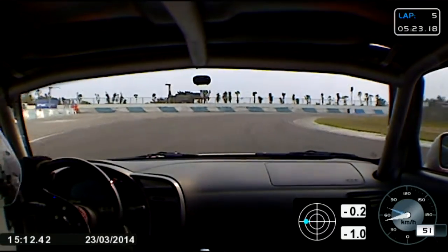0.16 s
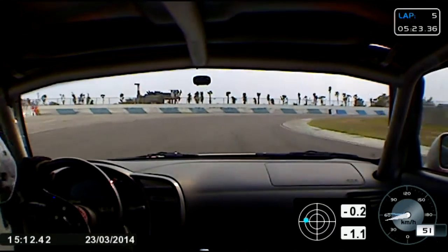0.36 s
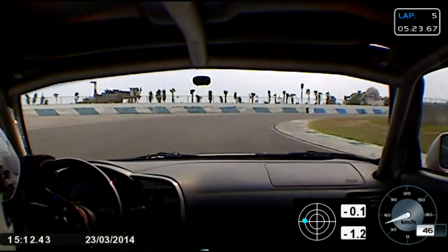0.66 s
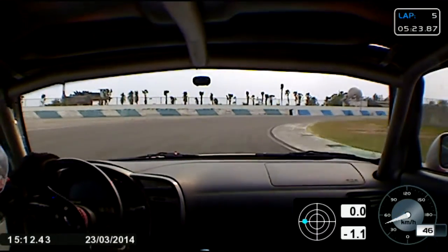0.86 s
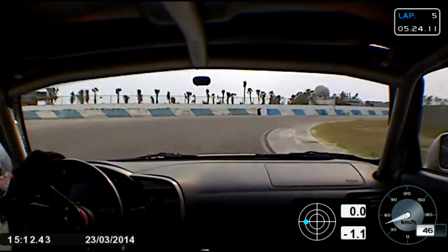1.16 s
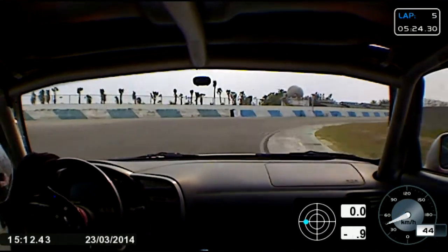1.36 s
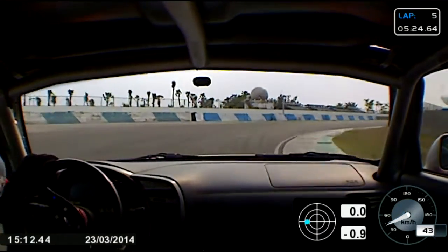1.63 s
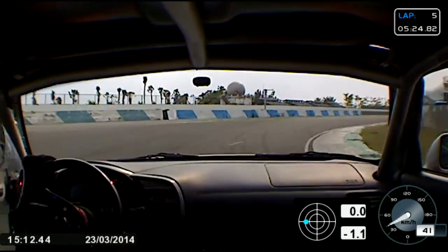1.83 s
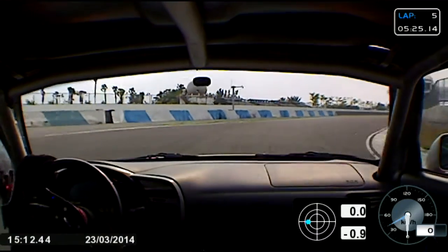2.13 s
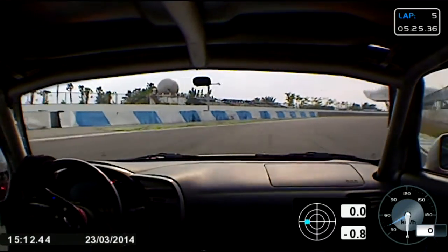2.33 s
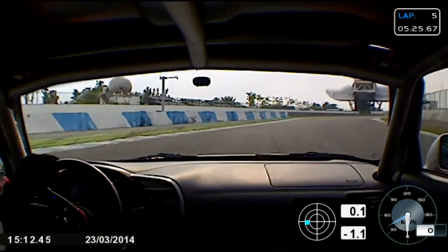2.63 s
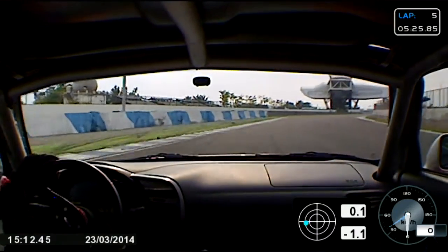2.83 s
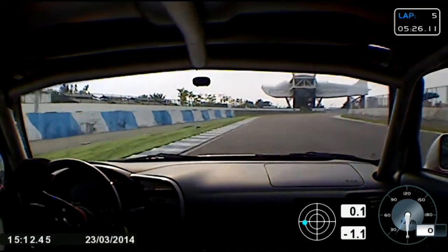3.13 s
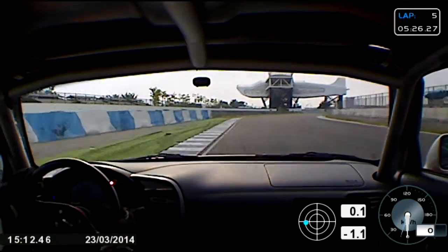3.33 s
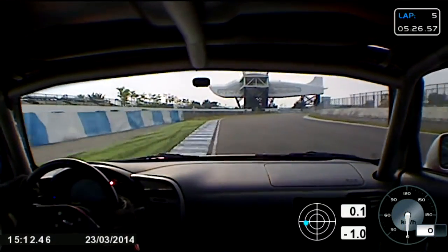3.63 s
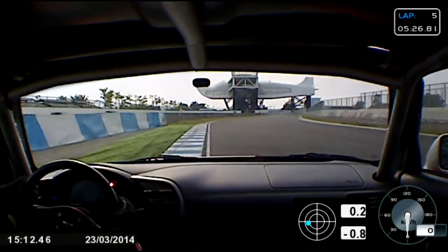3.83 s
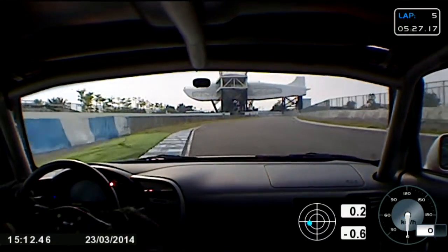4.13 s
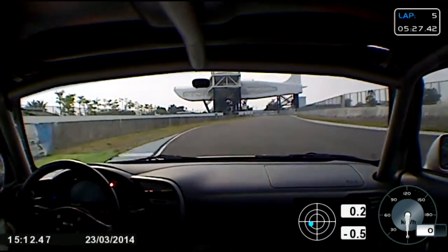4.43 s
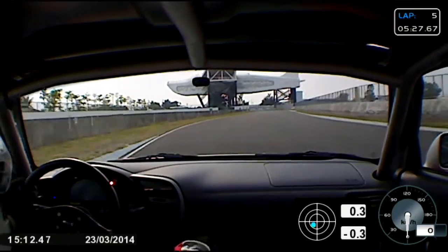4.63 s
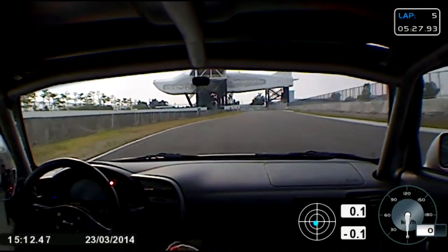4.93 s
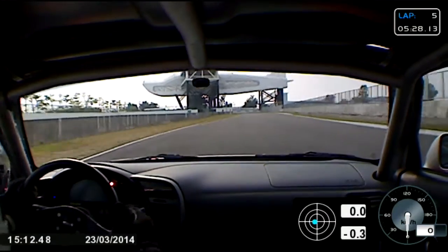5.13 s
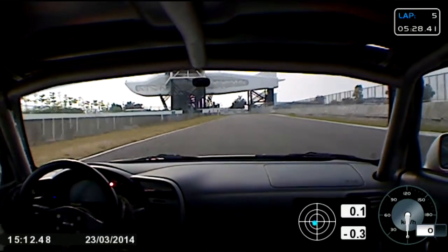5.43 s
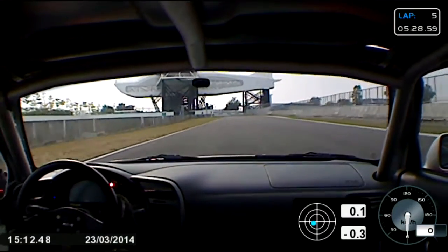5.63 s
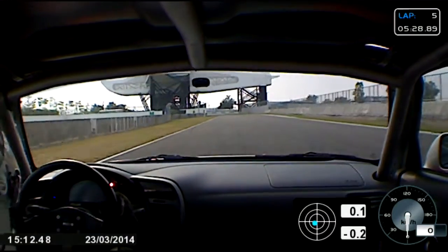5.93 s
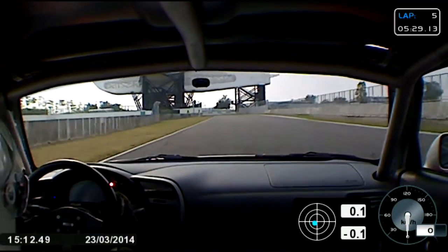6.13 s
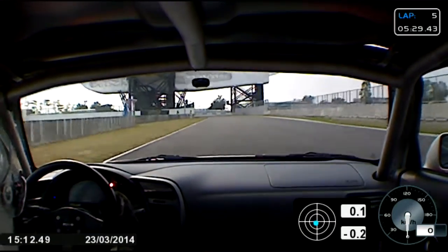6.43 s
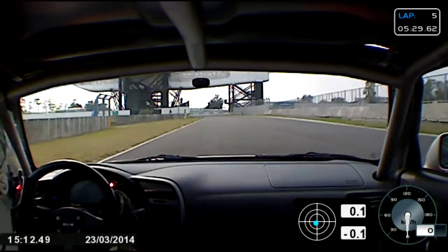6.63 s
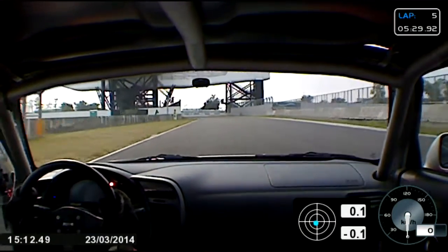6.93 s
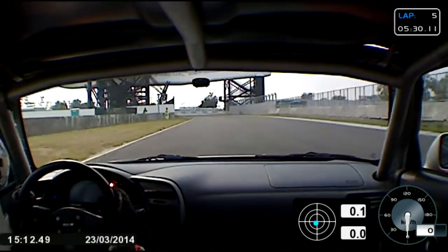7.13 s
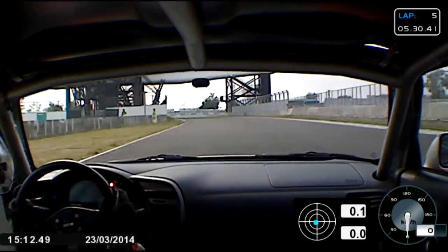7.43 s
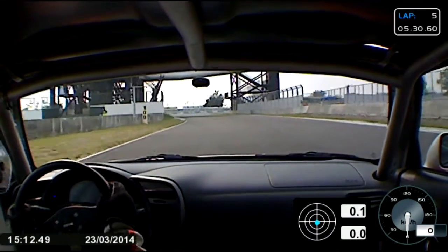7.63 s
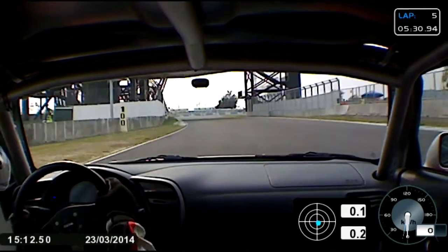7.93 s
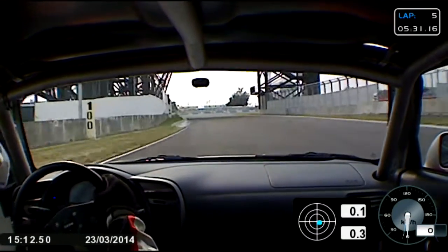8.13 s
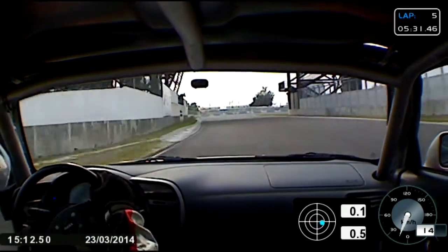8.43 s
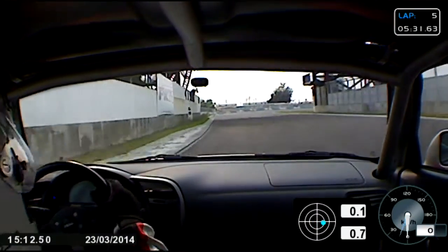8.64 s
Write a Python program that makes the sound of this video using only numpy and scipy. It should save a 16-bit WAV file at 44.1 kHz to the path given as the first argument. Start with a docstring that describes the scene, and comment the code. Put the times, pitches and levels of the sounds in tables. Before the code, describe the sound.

Close inside a race car cabin on a circuit, a four-cylinder engine holds a low, rough drone from 0 to about 2 seconds, wavering slightly, with a gear whine, hollow road rumble and very faint squeaks. The revs then climb steadily, the tone growing harder and more howling. From about 3.7 to 4.4 seconds the wheels run along a ribbed kerb: low humming, a quick string of dull thumps, clattering panels and a few dry clacks. The exhaust swells and flares into a heavy, overloaded boom near 4.7, then cuts abruptly for an upshift; the pitch falls until about 5.2. In the higher gear, with fainter whine, the engine pulls again with a throbbing, snarling note over quieter road noise. Faint squeaks pass around 6.2 to 6.6. Revs keep climbing, hardening after 7.8 into a raspy roar, with a last booming swell near 8.7 as the pitch dips.

```python
"""Race car heard from inside its cabin

A four-cylinder engine holds a corner, accelerates over a ribbed kerb, flares into a loud boom at an upshift
and pulls again. Its harmonics and gated noise pass through fixed resonances; filtered noise gives the road
rumble that rings the cabin. The gears whine, the wheels thump, loose parts clack and something squeaks
faintly. The small microphone rasps when it is overloaded."""
import sys
import numpy as np
from scipy import signal
from scipy.fft import rfft, irfft, next_fast_len
from scipy.io import wavfile
from scipy.ndimage import uniform_filter1d, minimum_filter1d

SR = 44100
rng = np.random.default_rng(int(sys.argv[2]) if len(sys.argv) > 2 else 0)


def unload_wav(signal):
    """Save mono or channel-first audio to the path in sys.argv[1] as 16-bit WAV at rate SR, clipped to [-1, 1]."""
    wavfile.write(
        sys.argv[1],
        SR,
        np.round(np.clip(np.atleast_2d(signal).T, -1, 1) * 32767).astype(np.int16),
    )


N = 386757
TIME = np.arange(N) / SR
CYLINDERS = 4  # firings in one four-stroke cycle
# around this cycle rate the engine comes on song and hardens, over this range of rates
SONG_HZ, SONG_RANGE_HZ = 59.34, 0.14

# nominal four-stroke cycle rate, a quarter of the firing rate: time_s, cycle_rate_hz
CYCLE_RATE = [(0.0, 53.62), (1.15, 54.01), (1.8, 54.87), (2.35, 55.98), (3.05, 57.56), (3.65, 59.09),
              (4.22, 61.33), (4.4, 62.6), (4.67, 63.94), (4.9, 59.6), (5.0, 55.04), (5.12, 53.84),
              (5.21, 50.22), (6.75, 55.65), (7.2, 56.41), (7.8, 59.02), (8.58, 61.18), (8.73, 59)]
# brief jumps and sags of the revs: middle_s, half_length_s, cycle_rate_change_hz
REV_BLIPS = [(0.63, 0.0811, -0.2), (0.793, 0.06983, 1.27), (1.902, 0.04595, 3), (4.745, 0.03703, 3.5),
             (7.274, 0.036, 0.76), (7.535, 0.024, 0.9)]
# the exhaust tones dip in level, most sharply just before the upshift: middle_s, half_length_s, relative_depth_db
EXHAUST_DIPS = [(0, 0.12, -2), (.55, 0.36, -5), (1.81, .05, -2.5), (2.11, 0.087, -3.5),
                (4.795, .012, -10.5), (4.95, 0.1, -2.5), (5.08, 0.13, -4), (7.19, 0.042, -1.5)]
# the exhaust boom flares at the firing rate: middle_s, half_length_s, gain_db
BOOM_FLARES = [(4.096, 0.074, 6), (4.3, 0.11, 5.5), (4.735, .047, 18), (4.82, 0.013, 6), (4.872, .03, 11),
               (8.548, 0.037, 3), (8.75, 0.042, 7.5)]
# the throttle is shut for the gear change: start_s, end_s
THROTTLE_SHUT = (4.775, 5.2)
# the higher gear takes up the load: start_s, end_s
GEAR_CHANGE = (4.9, 5.3)
# multiples 2 to 9 of the cycle, relative strength: lower_gear_db, higher_gear_db
DRONE_ORDERS = [(-5.5, 1.1), (9.5, 9.5), (16.5, 17.5), (-5.5, -3.5), (0.46, -1.5), (-7, 2.1), (13, 12),
                (-11, 1)]
# cabin resonances that the low exhaust tones swell through: frequency_hz, width_hz, gain_db
CABIN_MODES = [(124.74, 7.1, -18.5), (159.6, 19.6, -43), (213.8, 8.9, -48), (231, 2.2, -47),
               (249.3, 18.1, -38), (276.6, 13.84, -18), (293.3, 5.4, -35.5), (324.1, 12, -29),
               (353, 32, -39), (372.4, 20, -42.5), (435, 15, -56.5), (472.4, 28.4, -42.5), (512, 23, -50)]
# burble noise spectrum: frequency_hz, relative_level_db
BURBLE_SPECTRUM = [(150, -34), (195, -11), (245, -2.5), (275, 13), (305, 4.5), (350, -3), (400, -4.5),
                   (480, -8.5), (600, -28.5), (3000, -110)]
# body resonances over the exhaust snarl: frequency_hz, relative_level_db
SNARL_SPECTRUM = [(465, 6.5), (490, 2), (540, -2), (610, -17), (700, -17.5), (780, -1.5), (830, 0.5),
                  (885, 2), (930, -6), (1070, -4.5), (1200, -4.5), (1380, -20.5), (1650, -7), (1760, -13),
                  (1850, -14.5), (2100, -22.5), (3200, -33)]
# resonances that the firing harmonics cross: frequency_hz, relative_level_db
HOWL_SPECTRUM = [(625, -1), (655, -4), (690, -8), (712, 8), (740, -5), (790, 1.5), (833, 11.5), (875, 1),
                 (913, 6.5), (938, 5.5), (955, 10), (985, 19), (1000, 8.5), (1045, 4.5), (1110, 1),
                 (1150, -4), (1210, 0.5), (1260, -6.5), (1310, -18.5), (1370, -3.5), (1480, -11.5),
                 (1560, 1.5), (1620, -4.5), (1683, -8), (1756, -13.5), (1923, -10.5), (2150, -25),
                 (2850, -20)]
# crank-rate blare spectrum at high revs: frequency_hz, relative_level_db
BLARE_SPECTRUM = [(375, -33.5), (500, -31.5), (560, -53), (630, -43), (750, -56.5), (855, -62.5),
                  (885, -50), (1000, -61.5), (1130, -50), (1390, -47.5), (1700, -57), (2000, -66)]
# intake and valve-gear noise spectrum: frequency_hz, relative_level_db
RUSH_SPECTRUM = [(200, -20), (520, -12), (660, -6), (850, 5.5), (1100, 2), (1350, -1.5), (1540, -4.5),
                 (1680, 0), (1900, -4), (2080, -15.5), (3200, -13), (3650, -21.5), (7000, -31.5),
                 (8000, -41.5), (9000, -38.5), (11000, -54), (15000, -62.5)]
# wheel blows: start_s, relative_level_db
WHEEL_BLOWS = [(3.724, -12), (3.797, -11), (3.853, -9), (3.904, -12), (3.956, -9), (4.005, -6), (4.07, -6),
               (4.0831, -7.5), (4.231, -16), (4.298, -10)]
# ringing modes of the body shell: frequency_hz, relative_level_db, decay_time_t60_s
SHELL_MODES = [(71.7, -27.5, 0.31), (130.4, 14, 0.063), (160, -10.5, 0.028), (203, -7.5, 0.22),
               (380, -13, 0.017)]
# the wheels run along the ribbed kerb: start_s, end_s
KERB_SPAN = (3.66, 4.43)
# loose fittings clack near some of the wheel blows: start_s, tick_level_db, knock_level_db
FITTING_CLACKS = [(4.022, -42, -41), (4.088, -44, -30), (4.096, -50, -35), (4.312, -60, -41)]
# road rumble, greatest on the kerb and least on the straight: time_s, level_db
ROAD_RUMBLE = [(0, -24), (.9, -28.5), (2.3, -27), (3.55, -26.5), (3.95, -18), (4.25, -23.5), (4.76, -26),
               (6.3, -33), (8.7, -27.5)]
# tyre noise spectrum: frequency_hz, relative_level_db
TYRE_SPECTRUM = [(20, -31), (45, -26), (65, -22), (85, -13.5), (105, -22), (180, -15), (290, -16.5),
                 (430, -19), (520, -28.5), (700, -38), (3000, -110)]
# faint squeaks: start_s, end_s, then the relative level of each of four partials: level_db x 4
SQUEAK_EVENTS = [(.12, .5, -73, -78, -79, -98), (2.081, 2.33, -76, -77, -78, -88),
                 (2.42, 2.886, -73, -78, -80, -97), (6.152, 6.494, -75, -77.5, -76.5, -87),
                 (6.426, 6.59, -70, -82, -73, -80)]
# nominal pitches of those partials: pitch_hz
SQUEAK_PITCHES = [4315, 4740, 6895, 9100]
# microphone overload rasp spectrum: frequency_hz, relative_level_db
RASP_SPECTRUM = [(200, -15.5), (600, -2.5), (1600, -1.5), (2200, -3.5), (3200, -6), (4000, -9.5),
                 (6800, -18.5), (8000, -30), (9500, -28), (12000, -38.5), (16000, -40)]


def crank(tremble=.0013, rock=.0026, rock_hz=4.6, shake=.006):
    """Torsional oscillation: the cycle rate trembles, rocks on springy drive shafts and is shaken by the kerb."""
    rocking = np.sin(2 * np.pi * np.cumsum(rock_hz * (1 + .2 * wander(3))) / SR)
    # the shafts rock most in the higher gear
    rocking *= rock * (1 + high_gear()) / 2
    unsteady = tremble * wander(45) + rocking + shake * on_kerb() * wander(60)
    nominal_hz, = curves(CYCLE_RATE)
    return (nominal_hz + swells(REV_BLIPS)) * (1 + unsteady)


def drone(turns, cycle_hz, boom_rough=0.16, drone_rough=0.14, octave_rough=0.16, fade_db=0.51,
          throb_db=-57, throb_gear_db=12, lag=0.3):
    """Harmonic excitation of modes: low exhaust orders, phase-locked to the cycle, slide through the cabin."""
    def tone(multiple, rough):
        # orders above the firing rate lag those below, so each bark starts sharply and dies away
        late = lag * np.tanh(multiple - CYLINDERS)
        wave = np.cos(2 * np.pi * (multiple * turns - late))
        return np.sqrt(2) * (1 + rough * wander(30)) * wave

    # a deep throb comes up with the heavier load of the higher gear
    out = gain_of(throb_db + throb_gear_db * high_gear()) * tone(1, drone_rough)
    for multiple, (low_gear_db, high_gear_db) in enumerate(DRONE_ORDERS, 2):
        if multiple == CYLINDERS:
            wave = gain_of(swells(BOOM_FLARES)) * tone(multiple, boom_rough)
        else:
            rough = octave_rough if multiple >= 2 * CYLINDERS else drone_rough
            wave = gain_of(fade_db * wander(6)) * tone(multiple, rough)
        order_db = low_gear_db + (high_gear_db - low_gear_db) * high_gear()
        out += gain_of(order_db) * cabin_gain(multiple * cycle_hz) * wave
    return gain_of(swells(EXHAUST_DIPS)) * out


def howl(turns, cycle_hz, level_db=-53.5, song_db=3, gear_db=1.0, flare=1.49, dip=1.0,
         flare_from_hz=62, flare_span_hz=2.8, shut_db=-7, kerb_db=-2.5):
    """Resonance crossing: firing harmonics cry out on song, and more as the boom flares at the highest revs."""
    top_revs = np.clip((cycle_hz - flare_from_hz) / flare_span_hz, 0, 1)
    load_db = (song_db + gear_db * high_gear()) * on_song(cycle_hz)
    load_db += flare * top_revs * swells(BOOM_FLARES) + dip * swells(EXHAUST_DIPS)
    load_db += shut_db * throttle_shut() + kerb_db * on_kerb()
    multiples = CYLINDERS * np.arange(3, 12)
    return gain_of(level_db + load_db) * harmonics(turns, cycle_hz, multiples, HOWL_SPECTRUM, flutter=.38)


def snarl(turns, cycle_hz, level_db=-52.5, song_db=4.0, song_db_per_hz=2.0, pull_db=2.5, dip=0.79):
    """Broken firing symmetry: unequal cylinders give a dense comb that slides under fixed body resonances."""
    multiples = [k for k in range(10, 52) if k % CYLINDERS]
    comb = harmonics(turns, cycle_hz, multiples, SNARL_SPECTRUM, flutter=.33)
    load_db = song_db * on_song(cycle_hz) + pull_db * pulling(cycle_hz)
    load_db += song_db_per_hz * np.clip(cycle_hz - SONG_HZ, 0, 4.5)
    return gain_of(level_db + load_db + dip * swells(EXHAUST_DIPS)) * comb


def blare(turns, cycle_hz, full_hz=62.6, db_per_hz=2.0, dip=1.8):
    """Inertial forcing: near top revs the pistons shake the car at multiples of the crank rate."""
    load_db = db_per_hz * np.minimum(cycle_hz - full_hz, 0) + dip * swells(EXHAUST_DIPS)
    # the crank turns twice in each cycle
    return gain_of(load_db) * harmonics(turns, cycle_hz, range(6, 31, 2), BLARE_SPECTRUM, flutter=.25)


def burble(turns, cycle_hz, depth=0.084, level_db=-39.5, song_db=7, gear_db=0.0, dip_rise=0.39):
    """Random combustion: noise pulsing with the cycle roughens the low tones, more while those tones dip."""
    puffs = pulse(turns, depth) * rng.standard_normal(N)
    load_db = song_db * on_song(cycle_hz) + gear_db * high_gear() - dip_rise * swells(EXHAUST_DIPS)
    return gain_of(level_db + load_db) * evened(coloured(puffs, BURBLE_SPECTRUM))


def rush(turns, cycle_hz, firing_depth=0.24, cycle_depth=0.042, level_db=-47.0, rev_slope_db=28,
         gear_db=2.5, song_db=0.0, flutter_db=0.72):
    """Modulated flow noise: intake and valve gear puff with each firing and cycle, growing with the revs."""
    gate = pulse(CYLINDERS * turns, firing_depth) + cycle_depth * np.cos(2 * np.pi * turns)
    noise = evened(coloured(gate * rng.standard_normal(N), RUSH_SPECTRUM))
    # the slope is in dB for each e-fold of the cycle rate
    revs_db = rev_slope_db * np.log(cycle_hz / cycle_hz.mean()) + song_db * on_song(cycle_hz)
    return gain_of(level_db + revs_db + gear_db * high_gear() + flutter_db * wander(50)) * noise


def buzz(turns, cycle_hz, low_hz=2200, high_hz=7000, level_db=-69.0, full_hz=62.6, db_per_hz=4,
         depth=.6, flutter_db=2):
    """Forced rattle: loose trim fizzes with each firing as the engine nears its top revs."""
    fizz = band_noise(low_hz, high_hz, N, pulse(CYLINDERS * turns, depth))
    revs_db = db_per_hz * np.minimum(cycle_hz - full_hz, 0)
    return gain_of(level_db + revs_db + flutter_db * wander(40)) * fizz


def panel(turns, cycle_hz, ring_hz=1675, width_hz=90, level_db=-55, depth=.6):
    """Narrow-band resonance: a thin panel, shaken once a cycle, rings with a nasal note."""
    shakes = pulse(turns, depth) * rng.standard_normal(N)
    ringing = resonate(resonate(shakes, ring_hz, width_hz), ring_hz, width_hz)
    return gain_of(level_db) * evened(ringing)


def driveline(cycle_hz, level_db=-42.5, gear_db=-13, fade_db=5.5):
    """Gear-mesh whine: a tone in fixed ratio to the cycle rate in each gear, fainter after the upshift."""
    per_cycle = np.interp(high_gear(), [0, 1], [7.524, 9.5535])
    turns = np.cumsum(per_cycle * cycle_hz) / SR
    whine = partial(turns, 1, rough=0.21)
    return gain_of(level_db + gear_db * high_gear() + fade_db * wander(5.5)) * whine


def thumps(rise_s=0.0096, level_db=3):
    """Impulse response: each blow is cushioned by the tyre, then rings the decaying modes of the body shell."""
    t, out = TIME[:SR // 3], np.zeros(N)
    ring = sum(gain_of(db - 60 * t / t60) * np.sin(2 * np.pi * hz * t) for hz, db, t60 in SHELL_MODES)
    ring *= 1 - np.exp(-(t / rise_s) ** 2)
    for start_s, blow_db in WHEEL_BLOWS:
        add(out, start_s, gain_of(blow_db + level_db) * ring / abs(ring).max())
    return out


def kerb(rib_hz=80, rough=0.12, level_db=-24):
    """Periodic forcing: the ribs of the kerb hum through the suspension at a slightly wavering rate."""
    turns = np.cumsum(rib_hz * (1 + .022 * wander(16))) / SR
    hum = (1 + rough * wander(30)) * np.sin(2 * np.pi * turns)
    return np.sqrt(2) * gain_of(level_db) * on_kerb() * hum


def clatter(low_hz=480, high_hz=1350, level_db=-41, flutter_db=3.0):
    """Random impact noise: the floor and panels clatter unevenly while the wheels are on the kerb."""
    return gain_of(level_db + flutter_db * wander(60)) * on_kerb() * band_noise(low_hz, high_hz, N)


def clacks(low_hz=2800, high_hz=6200, t60=0.014, panel_low_hz=450, panel_high_hz=1600, panel_t60=.07):
    """Damped impact: a dry tick of metal on trim, with the duller, longer knock of the panel behind it."""
    t, out = TIME[:SR // 10], np.zeros(N)
    for start_s, tick_db, knock_db in FITTING_CLACKS:
        tick = gain_of(tick_db - 60 * t / t60) * band_noise(low_hz, high_hz, len(t))
        knock = gain_of(knock_db - 60 * t / panel_t60) * band_noise(panel_low_hz, panel_high_hz, len(t))
        add(out, start_s, tick)
        add(out, start_s, knock)
    return out


def road(cabin_hz=139, width_hz=26, tyres_db=-36.0, follow=0.77, gear_db=3.5):
    """Noise-driven resonance: rolling keeps a hollow cabin mode ringing, over broader tyre rumble."""
    level_db, = curves(ROAD_RUMBLE)
    cabin = resonate(rng.standard_normal(N), cabin_hz, width_hz)
    cabin = evened(resonate(cabin, cabin_hz, width_hz))
    # steady rolling keeps the ringing even from moment to moment
    cabin /= np.sqrt(uniform_filter1d(cabin ** 2, size=7000) + 1e-6)
    tyres = evened(coloured(rng.standard_normal(N), TYRE_SPECTRUM))
    tyre_level_db = tyres_db + gear_db * high_gear() + follow * (level_db - level_db.mean())
    return gain_of(level_db) * cabin + gain_of(tyre_level_db) * tyres


def squeaks(waver=.0016, flicker_db=2):
    """Frictional vibration: rubbing metal gives thin, sustained squeals whose partials waver together."""
    clock, out = np.cumsum(1 + waver * wander(25)) / SR, np.zeros(N)
    for column, pitch_hz in enumerate(SQUEAK_PITCHES):
        level = np.zeros(N)
        for start_s, end_s, *partials_db in SQUEAK_EVENTS:
            envelope = signal.windows.tukey(max(int((end_s - start_s) * SR), 2), .5)
            add(level, start_s, gain_of(partials_db[column]) * envelope)
        out += level * gain_of(flicker_db * wander(23)) * np.sin(2 * np.pi * pitch_hz * clock)
    return out


def high_gear():
    """Load transfer: 0 before the upshift, rising to 1 after it."""
    return np.interp(TIME, GEAR_CHANGE, [0, 1])


def throttle_shut(ramp_s=.02):
    """Throttle closure: 1 while shut for the gear change, otherwise 0, with short ramps."""
    start_s, end_s = THROTTLE_SHUT
    return np.interp(TIME, [start_s, start_s + ramp_s, end_s - ramp_s, end_s], [0, 1, 1, 0])


def on_song(cycle_hz):
    """Soft threshold: 0 at moderate revs, 1 when the engine is on song."""
    return .5 + .5 * np.tanh((cycle_hz - SONG_HZ) / SONG_RANGE_HZ)


def pulling(cycle_hz):
    """Engine load: 0 to 1 as the engine labours in the higher gear, most at low revs."""
    return high_gear() * np.clip((SONG_HZ - cycle_hz) / 3, 0, 1)


def on_kerb():
    """Contact force: how firmly the wheels ride the kerb, an arch from 0 to 1 and back."""
    return np.sqrt(abs(np.sin(np.pi * np.interp(TIME, KERB_SPAN, [0, 1]))))


def cabin_gain(hz):
    """Modal response: the summed resonance curves of the cabin at the given frequencies."""
    return sum(gain_of(db) / (1 + (2 * (hz - mode_hz) / width_hz) ** 2)
               for mode_hz, width_hz, db in CABIN_MODES)


def partial(turns, multiple, rough, fade_db=1.0):
    """Amplitude modulation: one harmonic flutters quickly in level and slowly fades and returns."""
    level = (1 + rough * wander(16)) * gain_of(fade_db * wander(4))
    return level * np.cos(2 * np.pi * (multiple * turns + rng.random()))


def harmonics(turns, cycle_hz, multiples, spectrum, flutter):
    """Source and filter: multiples of the cycle rate take their levels from a fixed spectrum."""
    return sum(read(spectrum, k * cycle_hz) * partial(turns, k, flutter) for k in multiples)


def pulse(turns, depth):
    """Periodic modulation: a gain that swells about 1 once in each turn."""
    return 1 + depth * np.cos(2 * np.pi * turns)


def band_noise(low_hz, high_hz, size, gate=1):
    """Band-passed noise: optionally gated first, then filtered and scaled to unit rms."""
    band = signal.butter(3, [low_hz, high_hz], "band", fs=SR, output="sos")
    return evened(signal.sosfilt(band, gate * rng.standard_normal(size)))


def resonate(x, hz, width_hz):
    """Single resonator: a peak filter of unit gain at its centre."""
    return signal.lfilter(*signal.iirpeak(hz, hz / width_hz, SR), x)


def read(points, hz):
    """Spectral envelope: gain at the given frequencies, interpolated in dB over log frequency."""
    f, db = np.transpose(points)
    return gain_of(np.interp(np.log(hz + 1), np.log(f + 1), db))


def coloured(x, points):
    """Linear filtering: multiplies the Fourier transform of x by a spectral envelope."""
    size = next_fast_len(N)
    return irfft(rfft(x, size) * read(points, np.fft.rfftfreq(size, 1 / SR)), size)[:N]


def wander(hz):
    """Slow random modulation: unit rms, joining random values spaced hz to the second."""
    knots = rng.standard_normal(4000)
    return evened(np.interp(TIME * hz, np.arange(len(knots)), knots))


def swells(rows):
    """Gaussian envelopes: one rise or dip for each row of middle_s, half_length_s, size."""
    return sum(size * np.exp(-((TIME - s) / half_s) ** 2) for s, half_s, size in rows)


def curves(rows):
    """Linear interpolation: each column of a timed table, at every sample."""
    s, *columns = np.transpose(rows)
    return [np.interp(TIME, s, c) for c in columns]


def gain_of(db):
    """Logarithmic level: decibels to amplitude."""
    return 10 ** (np.asarray(db) / 20)


def evened(x):
    """Power normalization: scales to unit rms."""
    return x / np.sqrt(np.mean(x ** 2) + 1e-20)


def add(mix, s, sound):
    """Superposition: mixes a sound in place from time s."""
    part = mix[max(round(s * SR), 0):][:len(sound)]
    part += sound[:len(part)]


def scene(node_hz=99, node_width_hz=22):
    """Superposition: one slightly unsteady crank drives all the engine's layers, over the road."""
    cycle_hz = crank()
    turns = np.cumsum(cycle_hz) / SR
    layers = (drone, howl, snarl, blare, burble, rush, buzz, panel)
    engine = sum(layer(turns, cycle_hz) for layer in layers)
    jolts = thumps() + kerb()
    # the microphone sits in a quiet node of one standing wave that the jolts set up
    jolts = jolts - resonate(jolts, node_hz, node_width_hz)
    return (engine + driveline(cycle_hz) + jolts + clatter() + clacks() + road() + squeaks())[None]


def limiter(x, ceiling=0.95, hold_s=0.011):
    """Gain reduction: turns the level down smoothly whenever the crests pass the ceiling."""
    span = max(int(hold_s * SR), 2)
    crest = -minimum_filter1d(-abs(x), span)
    return x / uniform_filter1d(np.maximum(crest / ceiling, 1), span)


def record(dry, growth=3.15, rasp_db=-13, lopsided=0.26, edge_hz=15700):
    """Nonlinear transduction: big swings are limited, bend lopsidedly and rasp; then a low-pass limits the band."""
    x = limiter(dry[0])
    # the rasp grows steeply with the swing, smoothed over a few milliseconds around each crest
    strain = uniform_filter1d(abs(x) ** growth, size=110)
    rasp = gain_of(rasp_db) * coloured(strain * rng.standard_normal(N), RASP_SPECTRUM)
    # squaring makes the distortion; the high-pass at 300 Hz removes its steady offset and bass
    bend = signal.sosfilt(signal.butter(2, 300, "high", fs=SR, output="sos"), x ** 2)
    band = signal.firwin(511, edge_hz, window=("kaiser", 9), fs=SR)
    return signal.oaconvolve(x + lopsided * bend + rasp, band, "same")[None]


dry = scene()
out = record(dry)
unload_wav(out)
```